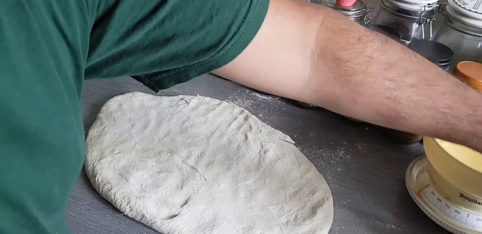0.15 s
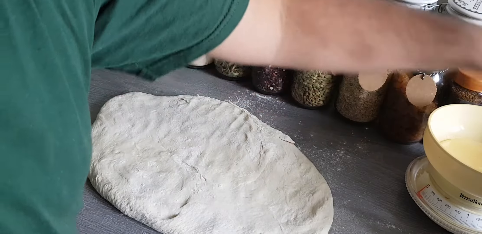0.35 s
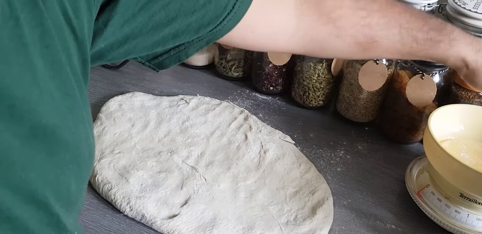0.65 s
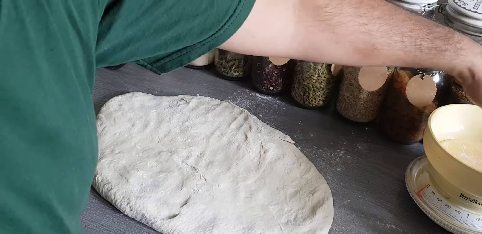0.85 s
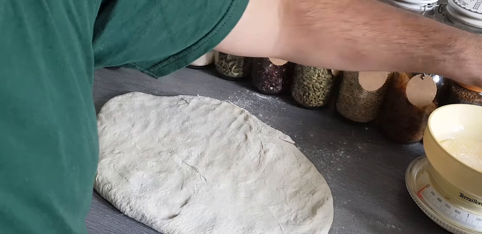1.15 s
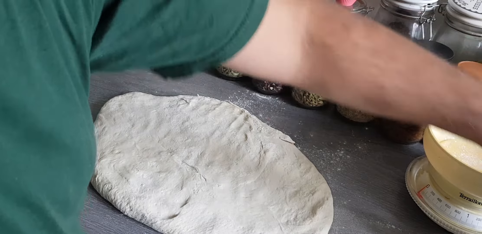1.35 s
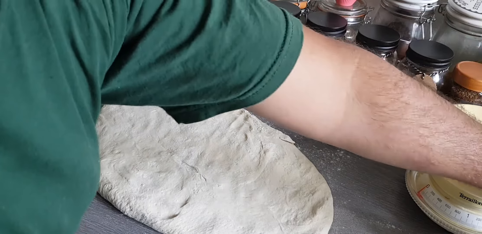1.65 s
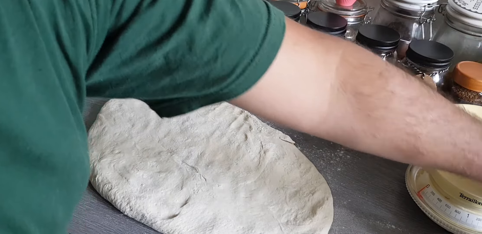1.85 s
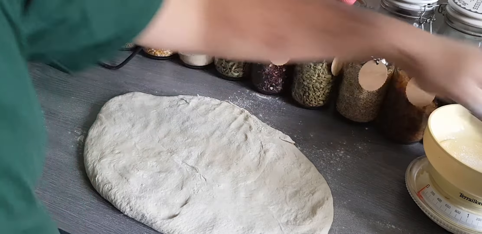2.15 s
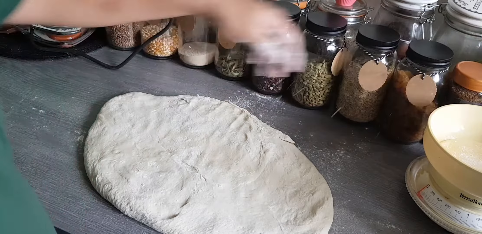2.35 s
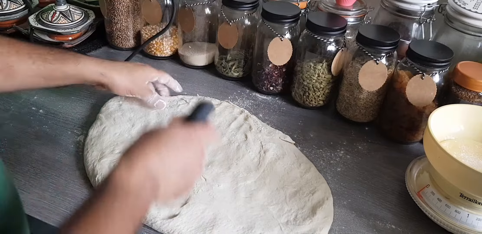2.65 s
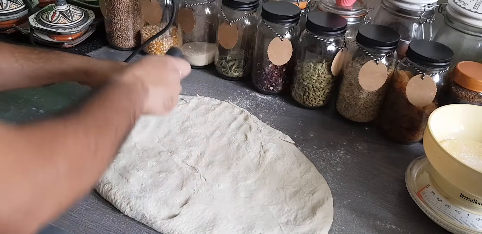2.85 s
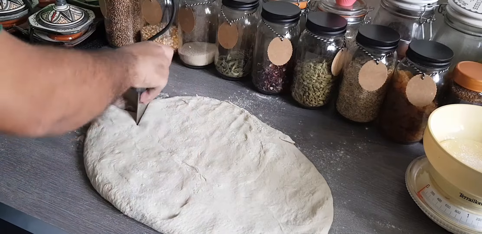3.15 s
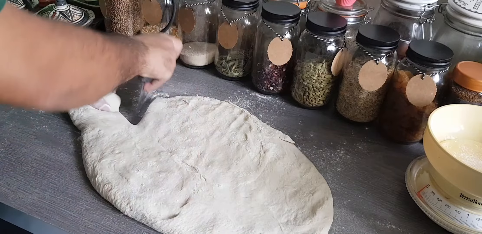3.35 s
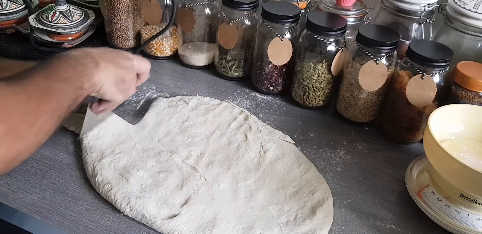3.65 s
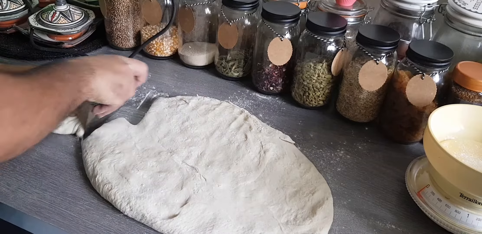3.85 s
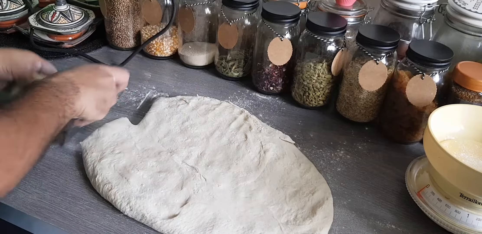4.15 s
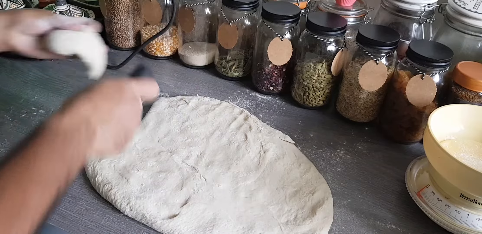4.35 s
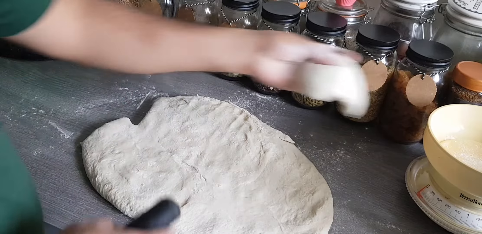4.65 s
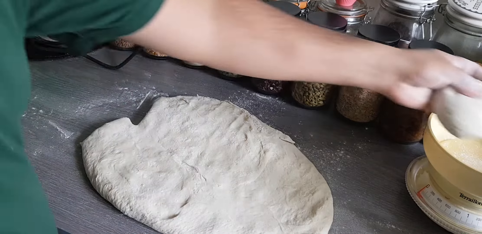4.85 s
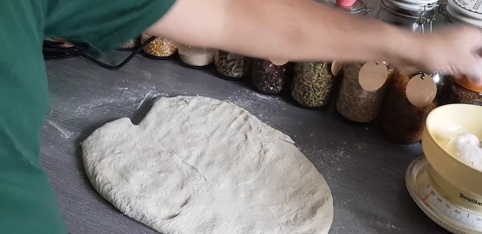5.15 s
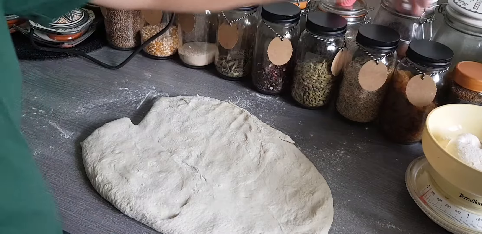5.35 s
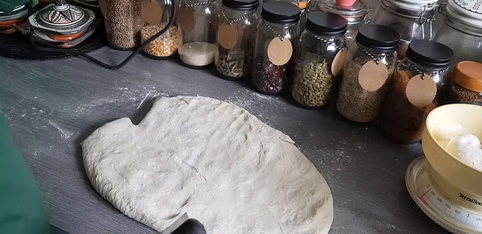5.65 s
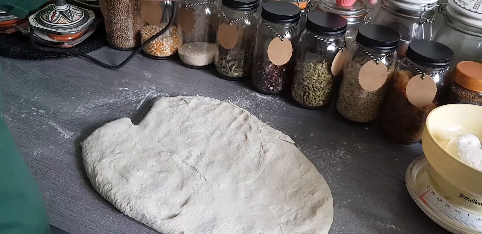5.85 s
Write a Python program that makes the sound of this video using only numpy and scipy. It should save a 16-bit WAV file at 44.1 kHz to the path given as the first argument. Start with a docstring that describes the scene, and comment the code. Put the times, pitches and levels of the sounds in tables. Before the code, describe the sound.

A cotton sleeve rustles close to the microphone, its folds snapping as an arm reaches out and back. A steel scraper then presses through bread dough in a few soft, crunching strokes with low bumps, and hits the worktop with one loud, sharp knock. A second later the cut piece slaps into a bowl, which rings briefly. A faint hiss and fan drone fill the small, lively kitchen.

```python
"""A cotton sleeve rustles close by, then come soft crunches, a sharp knock and a slap in a bowl.
Someone is portioning bread dough in a small, lively kitchen. The sleeve slides and its folds snap
as the arm reaches to the scale and back. A steel scraper presses through the dough in a few
strokes and knocks on the worktop. The cut piece drops into the bowl on the scale, which rings
briefly. Under it all lie low bumps, airy swishes, a soft hiss and the faint drone of a fan."""
import sys
import numpy as np
from scipy import signal
from scipy.io import wavfile

SR = 44100
rng = np.random.default_rng(int(sys.argv[2]) if len(sys.argv) > 2 else 0)


def master(y):
    """Save y as 16-bit WAV."""
    cut = np.clip(np.atleast_2d(y).T, -1, 1)
    pcm = np.round(cut * 32767)  # scale
    wavfile.write(sys.argv[1], SR, pcm.astype(np.int16))


N = 264159
TIME = np.arange(N) / SR
BAND_EDGES_HZ = 25 * 2 ** (np.arange(29) / 3)
BAND_CENTRES_HZ = np.sqrt(BAND_EDGES_HZ[1:] * BAND_EDGES_HZ[:-1])

# how alike both ears hear a close sound: pitch_hz, likeness (1 = the same)
NEAR = [(290, 0.95), (640, -0.05), (1400, -0.027), (3000, -0.00029)]
# the same for a sound farther off: pitch_hz, likeness
FAR = [(60, 0.58), (200, 0.8), (700, 0.42), (1400, 0), (16000, 0.084)]
# the room's echo: pitch_hz, fade_s (a fade is always the time to drop 60 dB)
ROOM_FADE = [(60, 0.59), (250, 0.4), (700, 0.4), (16000, 0.29)]
# tone of the room's hiss: pitch_hz, level_db
AIR_TONE = [(35, -40.5), (60, -1.5), (139, -5.5), (164, -27), (371, -8), (803, -10.5), (1040, -11),
            (4030, -19), (16000, -29.5)]
# rise and fall of the background: time_s, level_db
BACKGROUND_LEVEL = [(0, -59.5), (2.4, -56), (3.7, -53), (4.5, -59.5), (5.4, -61.5), (6, -62.5)]
# notes of the fan's drone: pitch_hz, level_db
FAN_NOTES = [(218, -0.5), (720, 1.5)]

# soft, low bumps: start_s, level_db
LOW_BUMPS = [(2.114, -49), (2.553, -51.5), (2.759, -47), (3.141, -47), (3.207, -49), (3.786, -40)]
# tone of a bump's rumble: pitch_hz, level_db
RUMBLE_TONE = [(60, 3.5), (130, -15), (250, -7), (600, -54)]
# deep notes of a bump: pitch_hz, level_db
BOOM_NOTES = [(80.4, 15.5), (126.5, 9)]

# faint, high, airy swishes and hisses: peak_s, level_db, half_length_s
AIRY_SWISHES = [(0.236, -43, 0.04), (0.473, -52.5, 0.061), (0.752, -52.5, 0.052), (0.99, -53, 0.021),
                (3.5, -61, 0.39), (5.517, -68.5, 0.15)]
# one sleeve slide per arm move: start_s, length_s, final_db, build_db, release_s, loose_cloth_db
SLEEVE_SLIDES = [(0.005, 0.05, -38.5, 2.5, 0.11, 0), (0.204, 0.065, -35.5, 3.5, 0.079, -3),
                 (0.35, 0.1, -55, 3, 0.42, 2.5), (0.747, 0.1, -50.5, 4, 0.3, -7),
                 (1.346, 0.14, -36.5, 7, 0.35, -2.5), (1.829, 0.28, -37, 5.5, 0.098, -4.5)]
# tone of the sliding weave: pitch_hz, level_db
COTTON_TONE = [(710, -42), (1200, -7.5), (3180, -6), (4080, -4), (8720, -9.5), (11800, -10.5), (15200, -14),
               (16000, -14)]
# tone of loose cloth flapping: pitch_hz, level_db
FLAP_TONE = [(40, -7), (250, -5), (480, -3), (1000, 2), (1600, -5), (2600, -10), (4000, -62)]
# folds snapping over: start_s, snap_db, tilt_db_per_octave, pop_db, fade_s
FOLD_SNAPS = [(0.0278, -22, -3.5, -52, 0.068), (0.256, -27.5, 6, -55, 0.039), (0.399, -29, -3, -54, 0.026),
              (1.26, -35.5, 5, -58, 0.038), (1.275, -28, 2.5, -30.5, 0.15), (1.434, -24.5, 2, -27, 0.088),
              (1.5074, -8.5, 3, -52, 0.021), (1.651, -23, -2, -34, 0.065), (1.7972, -18, 1.5, -27.5, 0.091),
              (1.908, -23, 3.5, -66, 0.052), (2.08, -30.5, -2.5, -30, .1)]
# tone of a fold's snap: pitch_hz, level_db
SNAP_TONE = [(60, -29), (250, -1), (650, 2), (1050, 5), (2100, -4.5), (5000, -11.5), (16000, -27)]
# a fold's hollow pop: pitch_hz, level_db
POP_NOTES = [(1038, -5.5)]

# blade strokes through the dough: peak_s, level_db, swell_s, release_s
BLADE_STROKES = [(2.81, -42, 0.03, 0.019), (3.262, -35, 0.029, 0.015), (3.529, -54, 0.02, 0.0071),
                 (3.823, -30, 0.013, 0.015)]
# tone of dough rubbing the blade: pitch_hz, level_db
FRICTION_TONE = [(88, -54), (150, -17), (240, -15), (494, -10.5), (720, -6.5), (1310, -7.5), (1900, -16),
                 (8900, -30.5), (14800, -30), (16000, -40)]
# floury dough dragging along steel and fingers: start_s, length_s, level_db
DOUGH_DRAGS = [(2.584, 0.41, -65.5), (3.03, 0.023, -54), (3.228, 0.43, -59), (3.824, 0.087, -48),
               (4.805, .03, -61)]
# tone of that dragging: pitch_hz, level_db
FLOUR_TONE = [(900, -25), (1500, -1), (3500, -3), (7000, -6.5), (8600, -18), (10600, -5.5), (16000, -22.5)]
# the blade landing on the worktop through dough: start_s, level_db
BLADE_THUNKS = [(2.815, -46), (3.2435, -41), (3.2555, -31), (3.8055, -34), (3.8193, -32), (3.8261, -31)]
# the blade hitting the worktop, edge first and then flat: start_s, level_db
BLADE_KNOCKS = [(4.0353, -1), (4.0380, 3), (4.0448, 2), (4.0590, -6.5), (4.0888, -9)]
# tone of a knock's crack: pitch_hz, level_db
CRACK_TONE = [(30, -25), (80, -17), (135, -24), (220, -22.5), (480, -20), (660, -8.5), (840, -14.5),
              (1450, -13.5), (1770, -20.5), (2250, -15.5), (4500, -29.5), (7200, -37.5), (9400, -48),
              (16000, -48)]
# notes of the steel blade, muffled by hand and dough: pitch_hz, level_db
BLADE_NOTES = [(675, 1.5), (960, -4.5), (1250, -4), (2300, -13.5)]
# notes of the worktop with the blade on it: pitch_hz, level_db
WORKTOP_NOTES = [(81, -13), (131, -17), (613, -9), (662, 1.5), (711, -6), (754, -5.5), (921, -6.5),
                 (980, -7), (1214, -2), (1262, -5), (1403, -7.5), (1470, -8), (1528, -7.5), (2038, -13),
                 (2183, -8.5), (2329, -8.5), (2457, -12), (2905, -13)]

# dough and fingers meeting the bowl: start_s, thud_db, slap_db, tick_db
BOWL_HITS = [(0.027, -29, -36, -63), (4.998, -37, -35.5, -40), (5.0067, -12.5, -25, -60),
             (5.0246, -42, -27, -32.5), (5.031, -34, -17.5, -38), (5.0365, -20.5, -28, -54),
             (5.0458, -45, -22.5, -56), (5.057, -28, -32, -62)]
# the bowl's hollow, muffled by dough: pitch_hz, level_db
HOLLOW_NOTES = [(466, -1.5)]
# the bowl's wall under a slap: pitch_hz, level_db
WALL_NOTES = [(1340, -3.5), (2550, -12)]
# tone of the bowl jolting on the scale: pitch_hz, level_db
RATTLE_TONE = [(110, -15), (190, -7.5), (290, -13), (470, 0), (748, -10), (1080, -11), (1350, -4.5),
               (1760, -13), (2490, -8.5), (6000, -26.5), (16000, -50)]
# tone of a sticky tick: pitch_hz, level_db
TICK_TONE = [(500, -30.5), (3000, -17), (7000, -4.5), (9500, -27), (12000, -6.5), (16000, -26)]
# notes of the bowl and scale pan: pitch_hz, level_db
BOWL_NOTES = [(447, 5), (883, 3), (953, -3), (1275, -7), (1340, 2.5), (1448, -7), (2170, 0.5), (2439, -4),
              (2557, -7), (2762, -5)]


def from_db(db):
    return 10 ** (np.asarray(db) / 20)


def unit_level(x):
    return x / np.sqrt(np.mean(x ** 2) + 1e-20)


def at_hz(table, hz):
    """Reads a table at any pitch, gliding between its rows."""
    pitches, values = np.transpose(table)
    return np.interp(np.log(hz), np.log(pitches), values)


def drift(rate_hz, size):
    """A random wobble, about 1 either way."""
    points = rng.standard_normal(8192)
    return np.interp(np.arange(size) / SR * rate_hz, np.arange(len(points)), points)


def add(out, start_s, sound):
    """Mixes a short sound in."""
    i = max(0, round(start_s * SR))
    out[:, i:i + sound.shape[-1]] += sound[..., :N - i]


def noise_bands(tone, likeness, size):
    """Stereo noise in slices a third of an octave wide: (band, channel, time)."""
    white, out = rng.standard_normal((2, 2, size)), []
    for k, hz in enumerate(BAND_CENTRES_HZ):
        band_filter = signal.butter(2, BAND_EDGES_HZ[k:k + 2], "band", fs=SR, output="sos")
        mid, side = signal.sosfilt(band_filter, white[k % 2])
        alike = np.clip(at_hz(likeness, hz), -1, 1)
        mid, side = np.sqrt(1 + alike) * mid, np.sqrt(1 - alike) * side
        out.append(from_db(at_hz(tone, hz)) * np.array([mid + side, mid - side]))
    out = np.array(out)
    return out / np.std(out.sum(0))


def burst(tone, likeness, fade_s, room_db, tilt_db=0):
    """One contact: a puff of noise and the room's echo, whose low end lasts longest."""
    t = TIME[:SR * 2 // 3]
    tail = from_db(room_db - 60 * t / at_hz(ROOM_FADE, BAND_CENTRES_HZ)[:, None])
    tilt = from_db(tilt_db * np.log2(BAND_CENTRES_HZ / 2000))[:, None]
    shape = np.hypot(from_db(-60 * t / fade_s), tail) * tilt
    return (noise_bands(tone, likeness, len(t)) * shape[:, None]).sum(0)


def ringing(notes, fade_s, spread, rise_s):
    """A struck object's notes swell and fade; higher ones reach the two ears more out of step."""
    t = TIME[:SR * 2 // 3]
    signs = rng.choice([-1, 1], (len(notes), 2))
    ring = 0
    for (hz, db), (sign, side) in zip(notes, signs):
        ear_phase = np.array([[side], [-side]]) * spread * min(hz / 1000, 1.2)
        ring += sign * from_db(db) * np.sin(2 * np.pi * hz * t + ear_phase)
    return ring * from_db(-60 * t / fade_s) * (1 - np.exp(-(t / rise_s) ** 2))


def grains(per_s, spread_db):
    """Tiny slips of uneven size at random moments."""
    sizes = from_db(spread_db * np.minimum(rng.exponential(1, N), 4)) * rng.choice([-1, 1], N)
    return unit_level(sizes * (rng.random(N) < per_s / SR))


def excite(x, response):
    """Every sample of x sets off a copy of the response, scaled to an energy of 1 per ear."""
    response = response / np.sqrt(np.sum(response ** 2) / 2)
    return signal.fftconvolve(np.atleast_2d(x), response, axes=1)[:, :N]


def slide(start_s, length_s, build_db, attack_s, release_s):
    """Loudness of one slide: it changes by build_db on the way; attack and release span 20 dB."""
    progress = np.clip((TIME - start_s) / length_s, 0, 1)
    outside = np.maximum((start_s - TIME) / attack_s, (TIME - start_s - length_s) / release_s)
    return from_db(build_db * (progress - 1) - 20 * outside.clip(0, 10))


def kitchen():
    """The room hisses softly and a fan drones faintly."""
    hiss = noise_bands(AIR_TONE, FAR, N).sum(0)
    drone = excite(rng.standard_normal(N), ringing(FAN_NOTES, fade_s=0.04, spread=0.28, rise_s=0.0018))
    level = from_db(np.interp(TIME, *np.transpose(BACKGROUND_LEVEL)))
    return level * (from_db(-1) * hiss + from_db(-7.5) * drone)


def bumps():
    """Soft, low bumps swell in, each a rumble with a short boom."""
    out = np.zeros((2, N))
    for start_s, db in LOW_BUMPS:
        rumble = burst(RUMBLE_TONE, FAR, fade_s=0.43, room_db=-9.5)
        boom = ringing(BOOM_NOTES, fade_s=0.061, spread=0.43, rise_s=0.01)
        swell = 1 - np.exp(-TIME[:boom.shape[1]] / 0.0069)
        add(out, start_s, from_db(db + 2) * (rumble + boom) * swell)
    return out


def swishes():
    """Faint, high, airy swishes and hisses swell and fade."""
    level = sum(from_db(db) * np.exp(-np.minimum(((TIME - peak_s) / half_s) ** 2, 40))
                for peak_s, db, half_s in AIRY_SWISHES)
    treble = signal.butter(2, [10000, 15500], "band", fs=SR, output="sos")
    return level * unit_level(signal.sosfilt(treble, rng.standard_normal((2, N))))


def rubbing(tone, patchy_db, rough_db):
    """Fibres catch for the first 2.5 s: each band flickers and all share a fast roughness."""
    size = SR * 5 // 2
    noise = sum(band * from_db(patchy_db * drift(45.02, size)) for band in noise_bands(tone, NEAR, size))
    rough = unit_level(noise * from_db(rough_db * drift(350, size)))
    return np.pad(rough, ((0, 0), (0, N - size)))


def worktop_echo(x, delay_s=0.001363, wander_s=0.00019, echo_db=-11.5):
    """A bounce off the worktop thins out some pitches; they wander as the arm moves."""
    earlier = TIME - delay_s - wander_s * drift(5, N)
    echo = np.array([np.interp(earlier, TIME, channel) for channel in x])
    return (x + from_db(echo_db) * echo) / np.hypot(1, from_db(echo_db))


def sleeve():
    """The sliding weave hisses and crinkles, loose cloth flaps and folds snap with a hollow pop."""
    weave, flap = 0, 0
    for start_s, length_s, db, build_db, release_s, loose_db in SLEEVE_SLIDES:
        move = from_db(db) * slide(start_s, length_s, build_db, attack_s=0.075, release_s=release_s)
        weave += move
        flap += from_db(loose_db) * move
    hiss = rubbing(COTTON_TONE, patchy_db=3.64, rough_db=1.16)
    catches = grains(per_s=300, spread_db=2.5)
    crinkle = excite(catches, burst(COTTON_TONE, NEAR, fade_s=0.0038, room_db=-13))
    out = worktop_echo(weave * (hiss + from_db(-5.5) * crinkle))
    out += flap * from_db(-2) * rubbing(FLAP_TONE, patchy_db=4, rough_db=0.5)
    pop = ringing(POP_NOTES, fade_s=0.14, spread=0.91, rise_s=0.0032)
    for start_s, snap_db, tilt_db, pop_db, fade_s in FOLD_SNAPS:
        snap = burst(SNAP_TONE, NEAR, fade_s, room_db=1.5 + 10 * np.log10(fade_s), tilt_db=tilt_db)
        add(out, start_s, from_db(snap_db - 9.5) * snap + from_db(pop_db) * pop)
    return out


def cutting():
    """Dough sticks and slips under each stroke, crunching and shaking the worktop, which it muffles."""
    force = sum(from_db(db) * np.exp(-np.maximum((s - TIME) / swell, (TIME - s) / release).clip(0, 40))
                for s, db, swell, release in BLADE_STROKES)
    slips = force * grains(per_s=1300, spread_db=-1.5)
    crunch = excite(slips, burst(FRICTION_TONE, FAR, fade_s=0.003, room_db=2.5))
    worktop = excite(slips, ringing(WORKTOP_NOTES, fade_s=0.14, spread=0.77, rise_s=0.0015))
    return from_db(2) * crunch + from_db(-4.5) * worktop


def dragging():
    """Floury dough drags along steel and fingers; countless slips blur into a hiss."""
    pull = sum(from_db(db) * slide(start_s, length_s, build_db=-5, attack_s=0.057, release_s=0.14)
               for start_s, length_s, db in DOUGH_DRAGS)
    slips = grains(per_s=21000, spread_db=6)
    return pull * excite(slips, burst(FLOUR_TONE, NEAR, fade_s=0.006, room_db=-4.5))


def thunks():
    """Cushioned by dough, the blade lands with a short, dull ring."""
    out = np.zeros((2, N))
    for start_s, db in BLADE_THUNKS:
        ring = ringing(BLADE_NOTES, fade_s=0.081, spread=0.31, rise_s=0.0017)
        scuff = burst(FRICTION_TONE, FAR, fade_s=0.027, room_db=-7.5)
        add(out, start_s, from_db(db) * (ring + from_db(-9) * scuff))
    return out


def knock():
    """The steel edge comes through and claps down; the hardest hit sets the worktop ringing."""
    out = np.zeros((2, N))
    for start_s, db in BLADE_KNOCKS:
        crack = burst(CRACK_TONE, FAR, fade_s=0.013, room_db=-13.5)
        steel = ringing(BLADE_NOTES, fade_s=0.037, spread=0.62, rise_s=0.00014)
        add(out, start_s, from_db(db - 8) * crack + from_db(db - 15) * steel)
    hardest_s, _ = max(BLADE_KNOCKS, key=lambda row: row[1])
    worktop = ringing(WORKTOP_NOTES, fade_s=0.29, spread=0.62, rise_s=0.00062)
    add(out, hardest_s, from_db(-15) * worktop)
    return out


def bowl():
    """Dough lands with a sticky tick and a thud, jolting the bowl; the hardest slap makes it ring."""
    out = np.zeros((2, N))
    thud = ringing(HOLLOW_NOTES, fade_s=0.025, spread=0.68, rise_s=0.0031)
    slap = ringing(WALL_NOTES, fade_s=0.032, spread=0.5, rise_s=0.002)
    for start_s, thud_db, slap_db, tick_db in BOWL_HITS:
        add(out, start_s, from_db(thud_db) * thud + from_db(slap_db) * slap)
        add(out, start_s, from_db(slap_db - 12) * burst(RATTLE_TONE, FAR, fade_s=0.12, room_db=-2.5))
        add(out, start_s, from_db(tick_db) * burst(TICK_TONE, NEAR, fade_s=0.015, room_db=-9.5))
    hardest_s, _, slap_db, _ = max(BOWL_HITS, key=lambda row: row[2])
    ring = ringing(BOWL_NOTES, fade_s=0.37, spread=0.68, rise_s=0.00047)
    add(out, hardest_s, from_db(slap_db - 22) * ring)
    return out


def scene():
    """Mixes all the sounds; the dough work and the bumps lie a little to the left."""
    leftward = cutting() + dragging() + thunks() + bumps() + knock() + bowl()
    return sleeve() + swishes() + leftward * from_db([[0.5], [-0.5]]) + kitchen()


def record(dry):
    """The microphone loses the deepest bass, clips the tallest peaks and cuts the highest treble."""
    bass_cut = signal.butter(2, 30, "high", fs=SR, output="sos")
    treble_cut = signal.ellip(10, 0.1, 80, 15850, fs=SR, output="sos")
    clipped = np.clip(signal.sosfilt(bass_cut, dry), -0.92, 0.92)
    return signal.sosfilt(treble_cut, clipped)


dry = scene()
out = record(dry)
master(out)
```